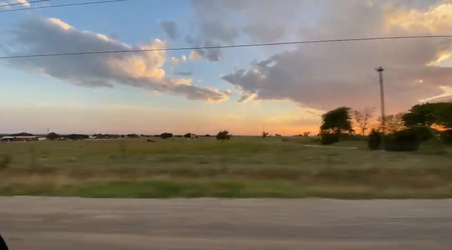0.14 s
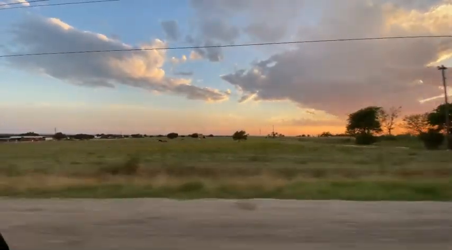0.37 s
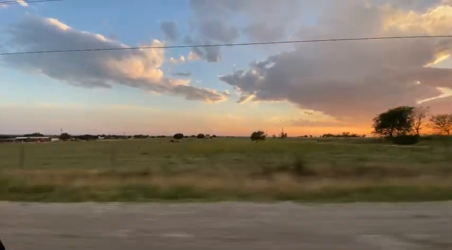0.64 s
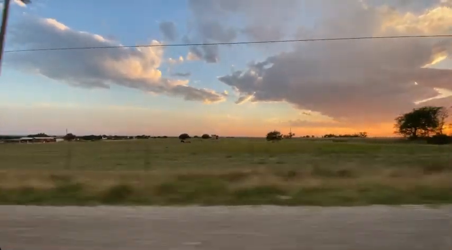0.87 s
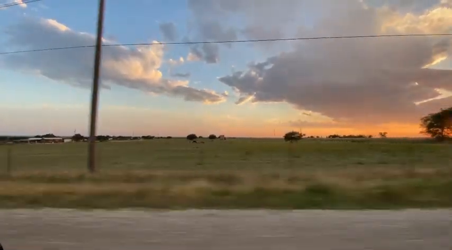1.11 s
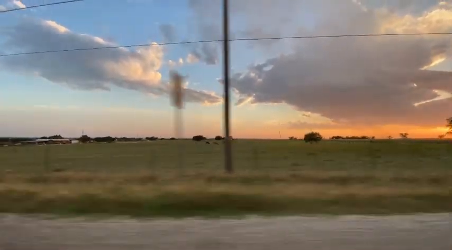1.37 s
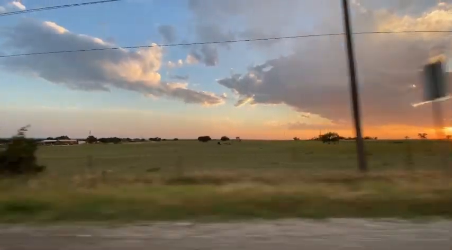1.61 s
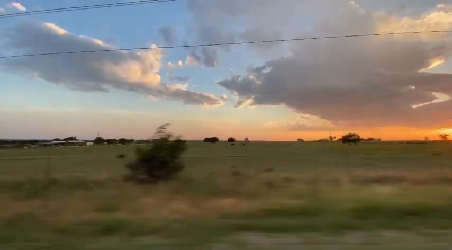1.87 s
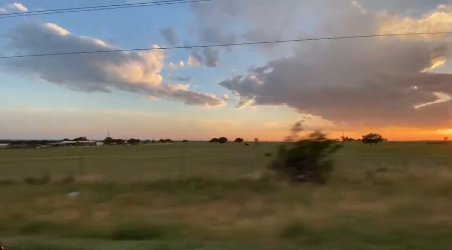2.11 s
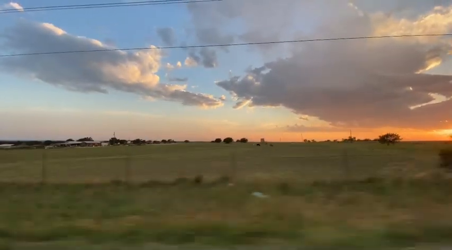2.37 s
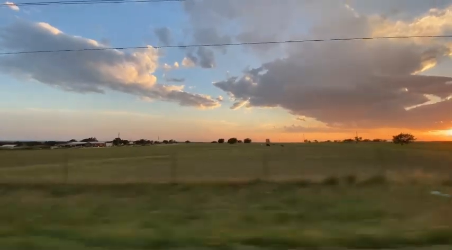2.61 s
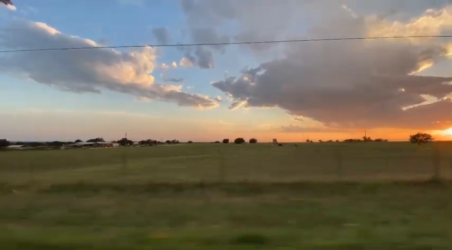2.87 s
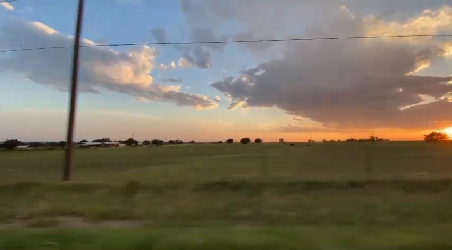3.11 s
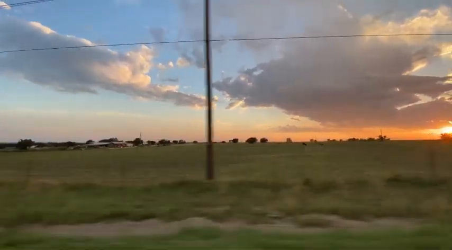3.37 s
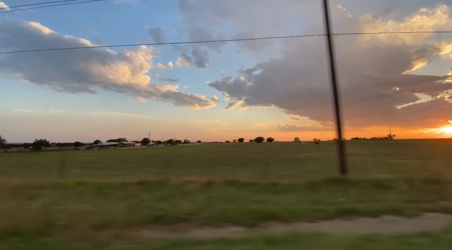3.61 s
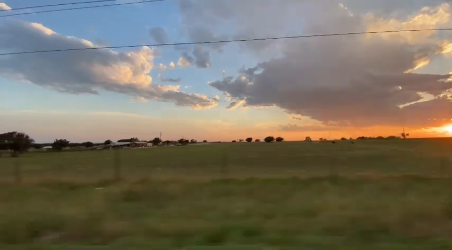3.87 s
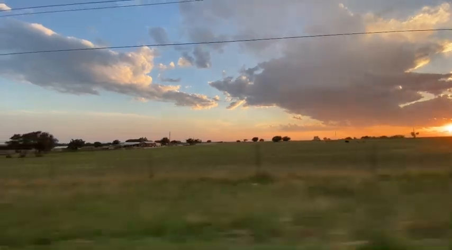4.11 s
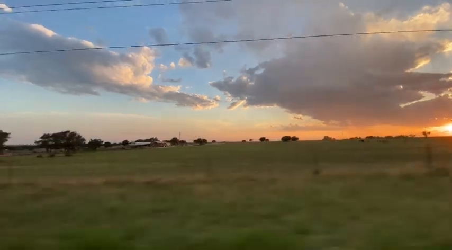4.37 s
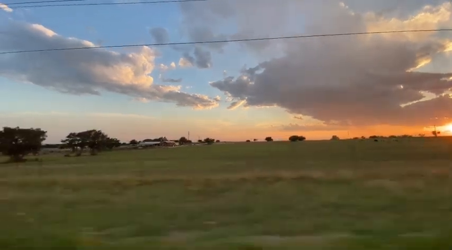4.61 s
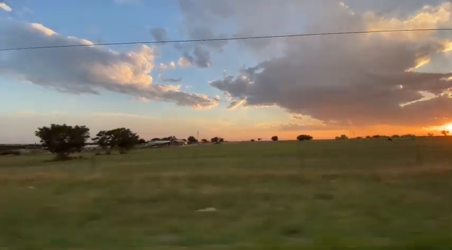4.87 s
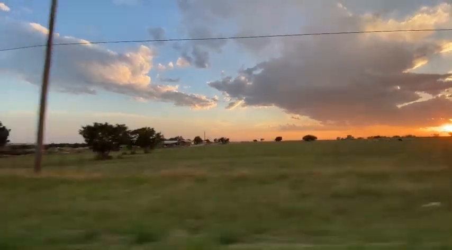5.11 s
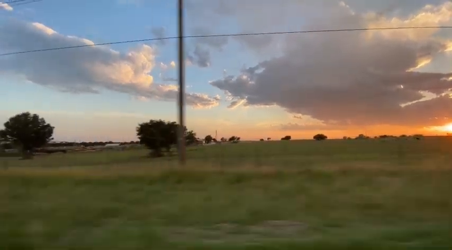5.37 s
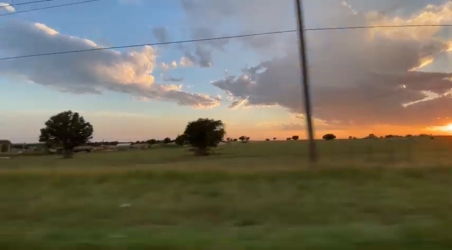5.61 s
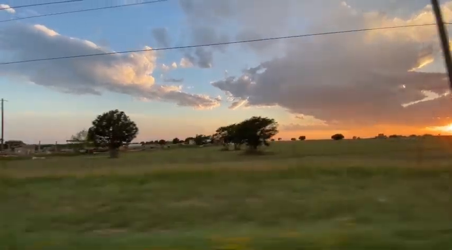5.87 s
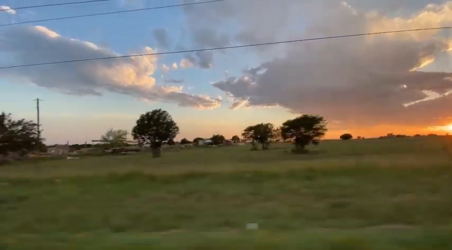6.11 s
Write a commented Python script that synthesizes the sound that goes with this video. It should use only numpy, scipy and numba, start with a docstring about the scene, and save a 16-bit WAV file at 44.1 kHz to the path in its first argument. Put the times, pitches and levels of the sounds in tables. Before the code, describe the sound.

Heavy bassy wind roar in a moving car, crackling with hard gusts early, then deep fluttering throbs and blunt thumps until it cuts off.

```python
"""Wind at a car window

Wind streams past a phone held at the open window of a moving car: filtered noise at its two ports.
The cabin throbs at some 50-70 Hz, eddies and gusts buffet both ports, the road hisses behind.
The phone gives both ears the same bass below a falling crossover and limits the peaks."""
import sys
import numpy as np
from scipy import signal
from scipy.fft import rfft, irfft
from scipy.io import wavfile
from scipy.ndimage import uniform_filter1d, minimum_filter1d
from numba import njit

SR = 44100
rng = np.random.default_rng(int(sys.argv[2]) if len(sys.argv) > 2 else 0)


def convert_level_to_amplitude(level_db):
    """Map a level in decibels to its linear amplitude factor."""
    exponent = np.asarray(level_db, float) / 20
    return 10 ** exponent


def wrap_up_sound(samples):
    """Save the sound to the file named by the first command line argument, as 16-bit audio."""
    columns = np.atleast_2d(samples).T
    # keep every value between -1 and 1, then stretch to whole-number steps
    tamed = np.clip(columns, -1, 1)
    steps = np.round(tamed * 32767).astype(np.int16)
    wavfile.write(sys.argv[1], SR, steps)


N = 275184
T = np.arange(N) / SR
HZ = np.arange(N // 2 + 1) * SR / N + 1  # 1 Hz up, so that its log is finite

# level of the left port over the right: freq_hz, left_over_right_db
LEFT_OVER_RIGHT = [(60, 3), (110, 0.5), (200, -0.5), (380, 2.5), (700, 0), (1290, 1), (2380, 2), (4400, 4),
                   (8120, 5), (15000, -3.5)]


def shape(points):
    """Gain at every frequency from (Hz, dB) points."""
    hz, db = np.transpose(points)
    return convert_level_to_amplitude(np.interp(np.log(HZ), np.log(hz), db))


def track(points):
    """Value at every sample from (s, value) points."""
    return np.interp(T, *np.transpose(points))


def unit(x):
    """Scale to rms 1."""
    return x / np.sqrt(np.mean(x ** 2))


def walk(rate_hz):
    """Random levels held for 1 / rate_hz and slewed twice; rms 1."""
    hold = int(SR / rate_hz)
    held = np.repeat(rng.standard_normal(N // hold + 1), hold)
    return unit(uniform_filter1d(uniform_filter1d(held, hold), hold)[:N])


def port_walks(rate_hz):
    """An independent walk for each port."""
    return np.array([walk(rate_hz), walk(rate_hz)])


@njit
def svf(x, hz, damp):
    """State-variable filter with a moving centre: rows low, band, high."""
    y = np.empty((3, len(x)))
    band_state, low_state = 0., 0.
    for i in range(len(x)):
        g = np.tan(np.pi * hz[i] / SR)
        band = (band_state + g * (x[i] - low_state)) / (1 + g * (g + damp))
        low = low_state + g * band
        y[0, i] = low
        y[1, i] = damp * band
        y[2, i] = x[i] - damp * band - low
        band_state = 2 * band - band_state
        low_state = 2 * low - low_state
    return y


def steady(x, even):
    """Divide out the chance swelling of noise at each port, fully at even = 1; rms 1."""
    envelope = np.abs(signal.hilbert(x))
    return unit(x / (envelope + 0.16 * envelope.mean()) ** even)


def lagged(x, share):
    """A share of the left port's power reaches the right port a moment later."""
    lag_s = 0.00048
    late = np.roll(x[0], int(lag_s * SR))
    return np.array([x[0], np.sqrt(share) * late + np.sqrt(1 - share) * x[1]])


def ports(gain, colour):
    """Noise under one gain per port, partly alike and partly opposed between the ports."""
    # opposed noise between the ports: freq_hz, opposed_over_alike_db
    opposed_points = [(30, -17), (70, -11), (150, -5), (330, 0), (500, 7), (750, 8), (1250, 0), (2400, -1),
                      (5000, 1), (15000, -1)]
    swept = 0.55  # power share from eddies that sweep past the right port first
    a, b = rng.standard_normal((2, N))
    alike = rfft(a * gain) * colour
    own = rfft(b * gain) * colour
    # -1j: a quarter cycle between alike and opposed, so the left port lags
    opposed = (np.sqrt(1 - swept) * own - 1j * np.sqrt(swept) * alike) * shape(opposed_points)
    tilt = np.sqrt(shape(LEFT_OVER_RIGHT))
    left = (alike[0] + opposed[0]) * tilt
    right = (alike[1] - opposed[1]) / tilt
    return irfft(np.array([left, right]), N)


def hiss():
    """Tyres and slipstream: smooth coloured noise, a little of it reaching the left port first."""
    # spectrum: freq_hz, relative_db
    spectrum = [(710, -11), (1200, -4), (2910, -15), (6050, -21), (7670, -32), (10000, -29), (11100, -33.5),
                (11700, -70.5), (12500, -65), (13300, -28.5), (14000, -32), (14800, -41), (15800, -57)]
    # level: time_s, level_db
    level = [(0, -54.5), (.75, -52), (.9, -60), (1.15, -52), (5, -52), (6.24, -54)]
    noise = lagged(rng.standard_normal((2, N)), 0.05) * convert_level_to_amplitude(1.5 * walk(3.8))
    colour = shape(spectrum) * np.sqrt(shape(LEFT_OVER_RIGHT)) ** np.array([[1], [-1]])
    return convert_level_to_amplitude(track(level)) * unit(irfft(rfft(noise) * colour, N))


def throb():
    """Cabin air swings at a wandering pitch; the phone's gain control holds its size evener than noise."""
    # swells and collapses: time_s, level_db
    level = [(0.0, -32), (0.28, -27), (0.29, -28), (0.52, -31), (0.62, -23), (0.8, -30), (0.83, -35),
             (1.01, -29), (1.06, -34.5), (1.2, -28.5), (1.29, -43), (1.32, -22.5), (1.39, -29.5),
             (1.44, -19), (1.56, -27), (1.65, -22), (1.88, -28.5), (1.91, -22), (2.14, -28.5),
             (2.36, -27.5), (2.41, -20.5), (2.45, -32), (2.5, -23), (2.59, -26), (2.85, -23), (2.9, -30),
             (3.14, -23), (3.18, -30), (3.23, -18.5), (3.28, -27.5), (3.32, -26.5), (3.44, -24),
             (3.46, -28.5), (3.6, -23), (4.0, -22.5), (4.17, -36), (4.22, -24), (4.33, -25), (4.36, -29),
             (4.38, -30), (4.74, -25), (4.78, -35), (4.8, -29.5), (4.86, -21), (4.92, -25.5), (5.23, -21),
             (5.3, -34), (5.35, -20.5), (5.68, -24), (5.74, -22), (5.84, -21), (5.87, -33), (5.91, -18.5),
             (6.08, -28.5), (6.14, -25), (6.24, -21.5)]
    # centre of the swing: time_s, pitch_hz
    pitch = [(0, 53.2), (1.0, 50), (1.4, 59.3), (3.8, 64), (5.1, 56.6), (5.7, 66.5), (6.24, 60)]
    wander, damp, even = 0.07, 0.66, 0.62  # wander: rms share of the pitch
    waver_db, waver_hz = 1.3, 22
    pitch_hz = track(pitch) * (1 + wander * walk(5.6))
    noise = ports(np.ones((2, N)), shape([(20, -28), (45, -6.5), (80, -3), (140, -5.5)]))
    swing = [svf(svf(c, pitch_hz, damp)[1], pitch_hz, 3 * damp)[1] for c in noise]
    swing = steady(np.array(swing), even)
    colour = shape([(15, -20), (27, -18), (40, 4), (95, -4), (170, -6.5)])
    cabin = unit(irfft(rfft(swing) * colour, N))
    return convert_level_to_amplitude(track(level) + waver_db * walk(waver_hz)) * cabin


def flurry(rate_hz, ms, spread_db):
    """Small eddies arrive at random as short swells of their own size; log level, mean 0, rms 1."""
    count = int(rate_hz * N / SR)
    when, size = rng.random(count), rng.exponential(1, count)
    hits = np.bincount((when * N).astype(int), convert_level_to_amplitude(2 * spread_db * np.minimum(size, 2.2)), N)
    swell = signal.fftconvolve(hits, np.hanning(int(ms * SR / 1000)), "same")
    log_level = np.log(np.abs(swell) + 0.09 * swell.mean())
    return unit(log_level - log_level.mean())


def eddies(spectrum, centres_hz, gust, gust_db, own_db, port_db, rate_hz, grow):
    """Octave bands swell with the shared gust, deeper in the treble, and flicker alone and by port."""
    out = 0
    for hz in centres_hz:
        band = np.cos(np.pi / 2 * np.clip(np.log2(HZ / hz), -1, 1))
        depth_db = gust_db * (hz / centres_hz[0]) ** grow
        gain = convert_level_to_amplitude(depth_db * gust + own_db * walk(rate_hz) + port_db * port_walks(rate_hz))
        out = out + ports(unit(gain), shape(spectrum) * band)
    return out / np.sqrt(np.mean(out.mean(0) ** 2))  # the mono mix has rms 1


def stream():
    """The steady wind: big and small eddies under one flurry of gusts."""
    # levels: time_s, big_eddies_db, small_eddies_db
    wind = [(0.0, -41, -41), (0.28, -42, -44.5), (0.38, -49, -42.5), (0.66, -53, -50), (0.87, -47, -43),
            (0.99, -38.5, -48.5), (1.25, -33.5, -38.5), (1.46, -37.5, -47.5), (2.17, -35.5, -45.5),
            (2.55, -37, -49.5), (3.04, -41, -46), (3.54, -33, -46.5), (3.94, -34, -42.5), (4.17, -38, -45),
            (4.38, -37.5, -46), (4.73, -37, -40), (5.0, -36.5, -45), (5.3, -27, -37.5), (5.6, -30.5, -44),
            (6.03, -34, -47.5), (6.24, -32.5, -44.5)]
    # big-eddy spectrum: freq_hz, relative_db_per_hz
    big_spectrum = [(41, -48), (70, -2), (140, -10), (327, -13), (476, -23.5), (583, -29), (700, -34.5),
                    (910, -45.5), (1540, -120)]
    # small-eddy spectrum: freq_hz, relative_db_per_hz
    small_spectrum = [(210, -32), (350, -9), (479, -7.5), (600, -10), (1180, -14), (2020, -27.5),
                      (2950, -37), (5590, -46.5), (7000, -52.5), (9100, -80), (15400, -120)]
    s, *columns = np.transpose(wind)
    big_db, small_db = (np.interp(T, s, c) for c in columns)
    gust = flurry(80, 14.8, 4.3)
    big = eddies(big_spectrum, [110, 220, 440], gust,
                 gust_db=2.66, own_db=0.8, port_db=0.93, rate_hz=40, grow=0.076)
    small = eddies(small_spectrum, [440, 880, 1760, 3520, 7040], gust,
                   gust_db=3.2, own_db=3.4, port_db=2.36, rate_hz=120, grow=0.14)
    return convert_level_to_amplitude(big_db) * big + convert_level_to_amplitude(small_db) * small


def ticks():
    """Sharp eddies: a millisecond of noise, bare and through the port's ring, mostly on the right."""
    # sharp eddies: start_s, relative_db
    eddy_rows = [(0.0202, -41.5), (0.0732, -50), (0.143, -52), (0.2269, -52), (0.2661, -50.5),
                 (0.327, -51.5), (0.7248, -53), (0.7731, -41), (0.9696, -51.5), (1.132, -56), (1.264, -55),
                 (1.4292, -51), (1.505, -48.5), (1.5708, -61), (1.6676, -46), (1.705, -48), (1.779, -49.5),
                 (2.0366, -50.5), (2.3452, -50.5), (2.4, -53), (2.871, -53), (3.2407, -46.5),
                 (5.229, -49.5), (5.5088, -60)]
    port_hz, port_t60_s, edge_db = 8700, 0.0097, 8.5
    n = int(0.0012 * SR)
    gain = np.zeros(N)
    for s, db in eddy_rows:
        start = int(s * SR)
        gain[start:start + n] += convert_level_to_amplitude(db) * np.hanning(n)
    burst = gain * rng.standard_normal(N)
    pole = np.exp(2j * np.pi * port_hz / SR - np.log(1000) / (port_t60_s * SR))
    ring = signal.lfilter([1], [1, -pole], burst).imag
    colour = shape([(1500, -18.5), (3000, 18.5), (7000, 6), (11000, -35), (13000, -32.5)])
    edge = irfft(rfft(burst) * colour, N)
    return convert_level_to_amplitude([[-22], [-4]]) * (ring + convert_level_to_amplitude(edge_db) * edge)


def weak_puffs():
    """Rows like the gust table for weaker gusts, at random moments and with scattered sizes."""
    per_s, level_db, thump_db, edge_db, length_ms, spread_db = 3, -30.5, 5, -23, 20, 1
    count = int(per_s * N / SR)
    when_s = rng.random(count) * N / SR
    chance = rng.standard_normal((count, 4))
    db = np.array([level_db, thump_db, edge_db]) + spread_db * chance[:, :3]
    ms = length_ms * convert_level_to_amplitude(spread_db * chance[:, 3])
    return list(np.column_stack([when_s, db, ms]))


def snaps(gust_power, per_s=450, db=-7, spread_db=3.5, ms=2.43):
    """Inside a gust, tiny eddies burst on one port or the other as dry snaps."""
    when, size, port = rng.random((int(per_s * N / SR), 3)).T
    hits = np.zeros((2, N))
    hits[(2 * port).astype(int), (when * N).astype(int)] = convert_level_to_amplitude(db - spread_db * np.log(size + 0.029))
    swell = signal.fftconvolve(hits, np.hanning(int(ms * SR / 1000))[None], "same")
    noise = swell * np.sqrt(gust_power) * rng.standard_normal((2, N))
    colour = shape([(700, -19), (1150, 9), (2000, -3.5), (4000, -24),
                    (6500, -26.5), (9000, -66), (12000, -48)])
    return irfft(rfft(lagged(noise, 0.13)) * unit(colour), N)


def ringing(x):
    """Add a broad moving resonance to both ports."""
    # ring of the middle-sized eddies: time_s, centre_hz, ring_over_noise_db
    ring_rows = [(0, 1234, -9.5), (.45, 1150, -2), (.68, 520, 8.5), (.78, 476, -3), (1.0, 476, 5),
                 (1.399, 630, -3), (2.3, 1125, -3.5), (3.3, 1004, -5), (4.9, 830, 3), (6.24, 955, -4)]
    s, hz, db = np.transpose(ring_rows)
    centre_hz = np.interp(T, s, hz)
    ring = unit(np.array([svf(c, centre_hz, 0.49)[1] for c in x]))
    return x + convert_level_to_amplitude(np.interp(T, s, db)) * ring


def puffs():
    """Gusts: ragged swells in three sizes of eddy with a sharp core, a little apart at the ports."""
    # sudden gusts: centre_s, relative_db, thump_over_that_db, edge_over_that_db, length_ms
    gust_rows = [(0.021, -24.5, -3, -27, 15), (0.036, -19, -9, -31, 2.8), (0.055, -20, -3, -34, 9.1),
                 (0.076, -24, -8, -2, 3.8), (0.093, -15.5, -5.5, -11, 11), (0.14, -30, -13, -27, 14),
                 (0.174, -27, 2.5, -24, 5.8), (0.265, -24.5, -10.5, -31, 27.5), (0.316, -20.5, -9, -22, 19),
                 (0.38, -23, -13, -17, 8.7), (0.394, -22.5, -8.5, -11, 12), (0.41, -25, -12, -14, 23),
                 (0.444, 9, 0, -13, 4.1), (0.475, -26, -11, -23, 7.5), (0.513, -21, -12, -14, 15.4),
                 (0.553, -22, -12, -28, 20), (0.57, -24, 0, -19, 6.9), (0.584, -17.5, -6, -14.5, 4.4),
                 (0.604, -24, -4, -17, 11), (0.627, -22, -10, -23, 14), (0.645, -21, -13.5, -10, 8.4),
                 (0.656, -18.5, -17, -27, 5), (0.679, -6, -13, -16.5, 4.7), (0.701, -9.5, 15, -19, 4.5),
                 (0.71, -11.5, -18.5, -5.5, 5.4), (0.727, -17.5, -6.5, -23, 14.4),
                 (0.75, -25, -3.5, -13, 8.4), (0.773, -11, -1.5, -4.5, 8.5), (0.791, -17.5, -24, -32, 4.1),
                 (0.806, -21.5, -19, -13, 8), (0.832, -32, -2, -15, 3), (0.84, -22, 1, -20, 8.7),
                 (0.861, -17, -4.5, -30, 4), (0.935, -21.5, -11, -37, 9), (0.966, -26.5, 7, -26, 3.7),
                 (1.022, -41, 18.5, -27, 12), (1.092, -24.5, 1, -13, 6.5), (1.117, -28.5, 10.5, -7, 16),
                 (1.178, -24.5, 7, -25, 27), (1.201, -23, 3, -13, 9.4), (1.222, -23, 4.5, -34, 7.4),
                 (1.259, -23, 5.5, -17, 14), (1.326, -19, 0.5, -19, 18), (1.348, -27.5, 2.5, -5.5, 8.9),
                 (1.411, -21, -0.5, -15.5, 19), (1.47, -21.5, 4, -16.5, 9.8), (1.578, -28.5, 7.5, -9, 28.5),
                 (1.625, -32.5, 8.5, -10, 18), (1.668, -26.5, 5, -10, 6.7), (1.7, -19.5, 1.5, -9.5, 28),
                 (1.779, -19.5, 8.5, -20, 6.2), (1.871, -19.5, 4, -20, 4.6), (1.93, -25, -2, -13.5, 9.7),
                 (2.108, -27.5, 3.5, -18, 11.3), (2.247, -27.5, -6, -20, 21), (2.287, -21, 1, -25, 16),
                 (2.335, -32, 8, -23, 37), (2.36, -28, -1, -23, 35), (2.387, -22.5, 2, -30, 28),
                 (2.5, -25.5, 6, -10, 14), (2.52, -29, 7.5, -19, 41), (2.57, -25.5, 9, -28, 13),
                 (2.588, -26, 2, -25, 7.6), (2.62, -26, 9.5, -24, 3.9), (2.684, -21, 13, -28, 15.5),
                 (2.714, -45, -14, -25, 5), (2.743, -31.5, 8, -13, 53), (2.852, -28, 9.5, -28, 26),
                 (2.94, -31, -11, -17, 39), (2.962, -36.5, -4, -21, 22), (3.173, -22, -16, -13.5, 16),
                 (3.203, -29, -1, -27, 7.2), (3.241, -18, -2, -14, 13.5), (3.318, -18.5, 11.5, -8, 8.2),
                 (3.375, -20, 6.5, -33, 6.7), (3.426, -27, 8, -11, 9), (3.5, -35, 12, -29, 10.6),
                 (3.59, -29, 11, -21, 6.6), (3.705, -37.5, 14.5, -25, 10), (3.77, -31, 8.5, -32, 14),
                 (3.802, -38.5, 18, -30, 13), (3.84, -40, -3, 10, 2.6), (3.869, -19, 10.5, -45, 15.4),
                 (4.003, -19, 8.5, -15, 20), (4.08, -30, -2, -32, 7), (4.101, -37, 20, -37, 23.4),
                 (4.215, -21, -33, -29, 8.9), (4.282, -27, -29, -30, 15), (4.315, -30.5, 0, -27, 32),
                 (4.41, -31, 0, -28, 31), (4.48, -26, 6.5, -17, 10.6), (4.688, -25, 2, -41, 9),
                 (4.866, -18, -15, -29, 4.8), (4.887, -18, -11, -26, 15), (4.9, -35, 3, -30, 6.1),
                 (4.948, -34.5, 17.5, -19, 12), (5.067, -27, 3, -15, 49), (5.087, -18.5, -5, -27, 3.3),
                 (5.106, -29, 12.5, -41, 17), (5.146, -21, 8.5, -10.5, 6.1), (5.168, -2, 0, -34, 5.4),
                 (5.205, -27, -7, -9, 8), (5.234, -24, -5.5, -4, 13), (5.297, -20, 5, -20, 12.6),
                 (5.332, -22, 11, -29, 13.6), (5.359, -18.5, 9, -5, 6), (5.46, -25, 10, -25, 9.9),
                 (5.475, -22, 1.5, -20, 10), (5.512, -27, -10, -13, 3.7), (5.555, -33, 5, -25, 13),
                 (5.576, -22.5, 8, -24, 3.3), (5.602, -16, -2, -7, 2), (5.614, -26.5, 5.5, -2.5, 9),
                 (5.682, -11, 0, -13, 10.3), (5.705, -25.5, -25, -30, 7.1), (5.74, -28.5, -2, -26, 13),
                 (5.762, -30, 9.5, -18, 8.4), (5.825, -19, 3.5, -16, 17), (5.853, -22.5, 11, -26, 12),
                 (5.908, -12, -16, -32, 4), (5.927, -8.5, 4.5, -24, 9.1), (5.945, -14.5, -1, -14, 3),
                 (5.966, -30, 10, -31, 18), (6.072, -28.5, 9, -36, 14.5), (6.145, -28, 8, -25, 23),
                 (6.175, -23, 11, -27, 5.5)]
    lean_left_db, lean_spread_db = 0.5, 2.5  # how much harder a gust strikes the left port
    # thump, middle, edge: share of the length, scatter between ports in s, roundness of the top
    sizes = [(1.0, 0.00027, 1.86), (0.62, 0.00023, 0.92), (0.094, 0.00016, 0.46)]
    # smaller eddies break up faster and deeper: dB, changes a second, evenness
    ragged = [(0.8, 119.6, 0.94), (2.2, 332, 0.57), (4.5, 496.5, 0.27)]
    colours = [[(80, 17), (150, 22), (300, 20), (480, 11), (720, -53.5)],
               [(300, 0), (620, -2.5), (1200, 1), (2800, -19), (4200, -68.5), (7000, -61)],
               [(2200, -10.5), (3200, -4.5), (6500, -29), (9000, -29), (12000, -40), (15000, -53)]]

    gusts = gust_rows + weak_puffs()
    power = np.zeros((3, 2, N))
    chance = rng.standard_normal((len(gusts), 3))
    for (s, db, thump_db, edge_db, ms), (*late, lean) in zip(gusts, chance):
        pan_db = lean_left_db + lean_spread_db * lean
        near = slice(max(int((s - .06) * SR), 0), int((s + .06) * SR))
        for k, rel_db in enumerate([thump_db, 0, edge_db]):
            stretch, scatter_s, roundness = sizes[k]
            half_s = stretch * max(ms, 2) / 2000  # the swell is 6.54 dB down here
            for c in range(2):
                away = np.abs(T[near] - s - scatter_s * late[c]) / half_s
                power[k, c, near] += convert_level_to_amplitude(2 * (db + rel_db - c * pan_db - 6.54 * away ** roundness))
    # no swell turns faster than about a millisecond
    power = np.maximum(uniform_filter1d(uniform_filter1d(power, 40), 40), 0)

    thump, middle, edge = [ports(np.ones((2, N)), shape(c)) for c in colours]
    noises = [thump, ringing(unit(middle)), lagged(edge, 0.2)]
    buffets = 0
    for p, noise, (db, rate_hz, even) in zip(power, noises, ragged):
        buffets = buffets + np.sqrt(p) * convert_level_to_amplitude(db * port_walks(rate_hz)) * steady(noise, even)
    return snaps(power[1]) + convert_level_to_amplitude(-4) * buffets


def scene():
    """All of the wind at the two ports."""
    return hiss() + throb() + stream() + ticks() + puffs()


def roll_off(x):
    """The treble ends steeply here."""
    return signal.sosfilt(signal.butter(12, 15940, fs=SR, output="sos"), x)


def record(dry):
    """The left port feeds both ears below the crossover; one look-ahead limiter holds the peaks."""
    # crossover: time_s, crossover_hz
    crossover = [(0, 1220), (.9, 880), (1.8, 383), (3.9, 286), (4.8, 113), (5.4, 35), (6.24, 25)]
    wobble_db, ceiling_db, hold = 1.3, -12.2, int(0.0028 * SR)
    hz = track(crossover) * convert_level_to_amplitude(wobble_db * walk(12))
    mid, side = (dry[0] + dry[1]) / 2, (dry[0] - dry[1]) / 2
    high = side
    for damp in (.77, 1.85):  # run forwards and backwards, so the crossover shifts no phase
        forwards = svf(high, hz, damp)[2]
        high = svf(forwards[::-1].copy(), hz[::-1].copy(), damp)[2][::-1].copy()
    low = side - high
    mix = np.array([mid + low + high, mid + low - high])
    room = np.minimum(convert_level_to_amplitude(ceiling_db) / (np.abs(mix).max(0) + 1e-9), 1)
    mix = mix * uniform_filter1d(minimum_filter1d(room, 2 * hold), hold)
    return roll_off(mix)


dry = scene()
out = record(dry)
wrap_up_sound(out)
```